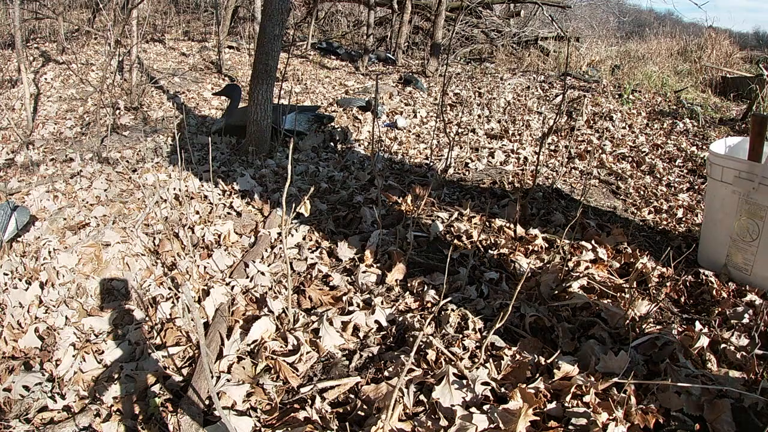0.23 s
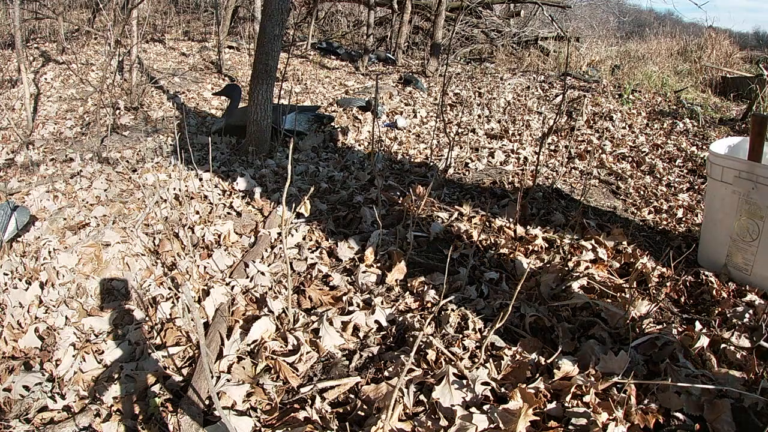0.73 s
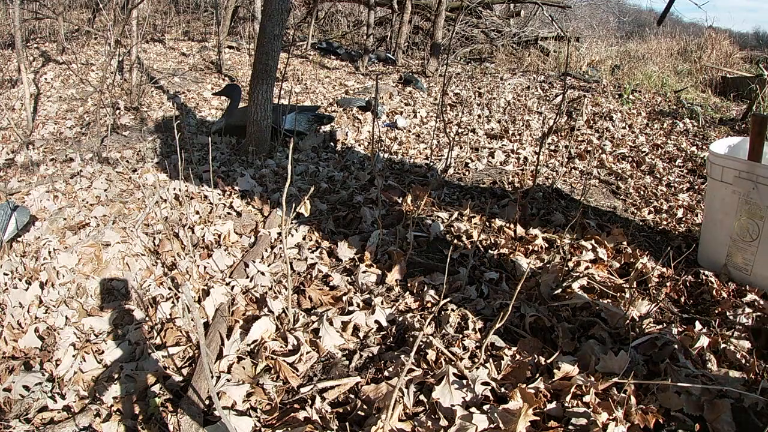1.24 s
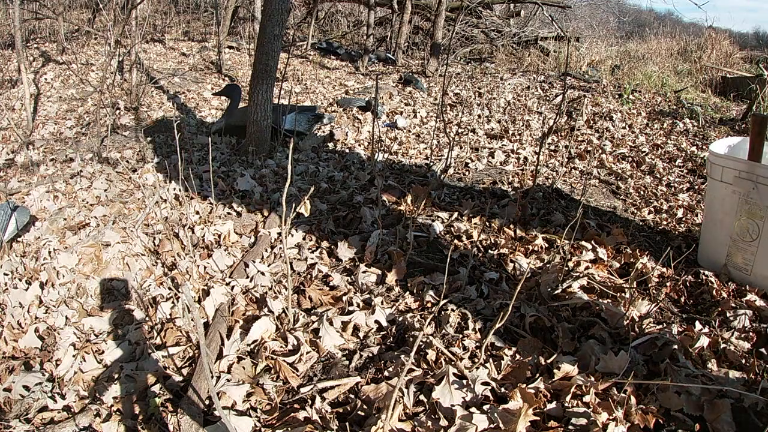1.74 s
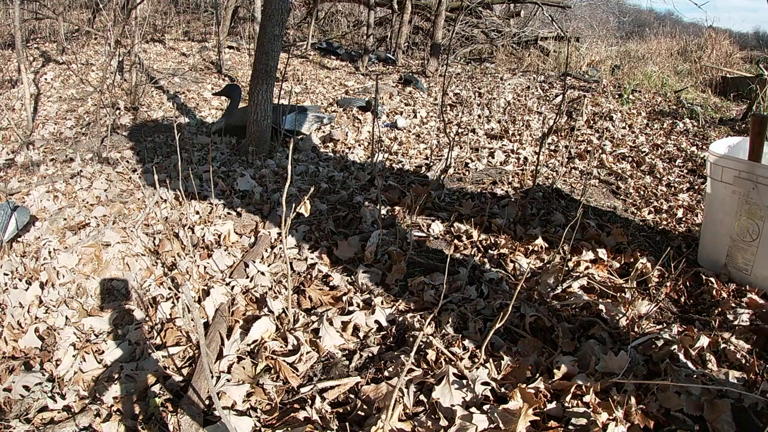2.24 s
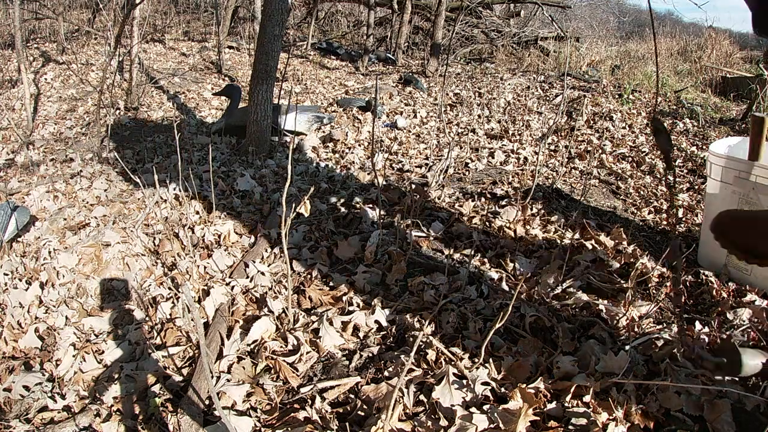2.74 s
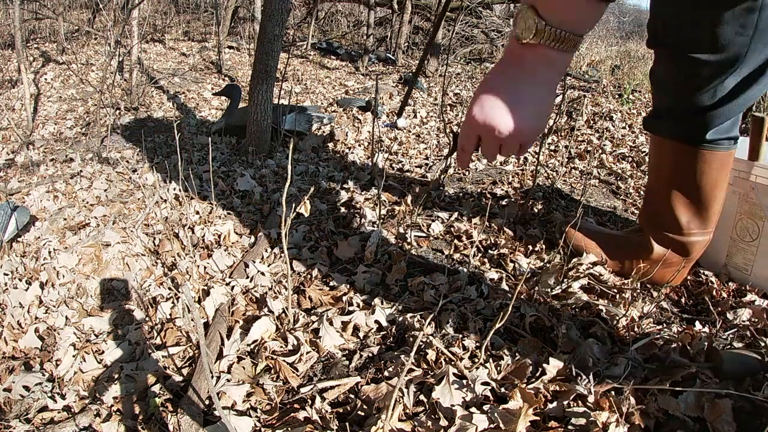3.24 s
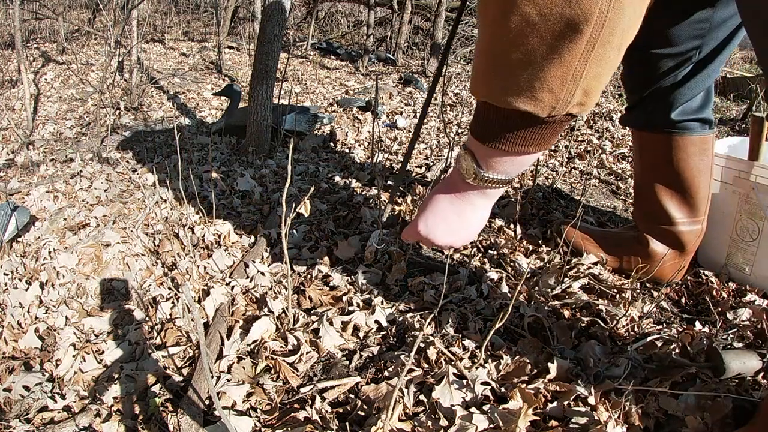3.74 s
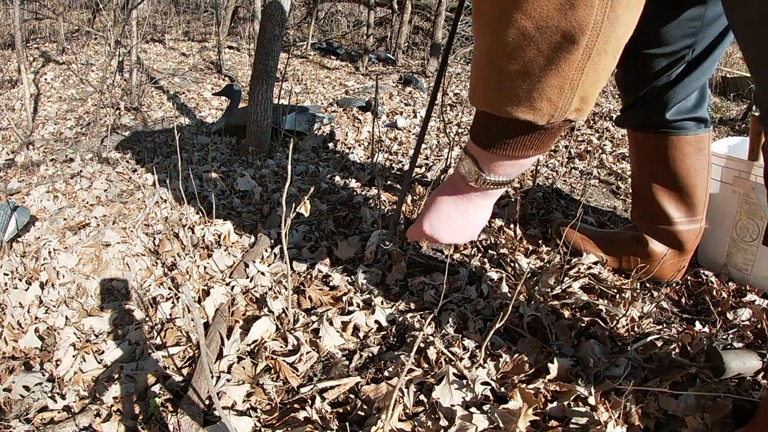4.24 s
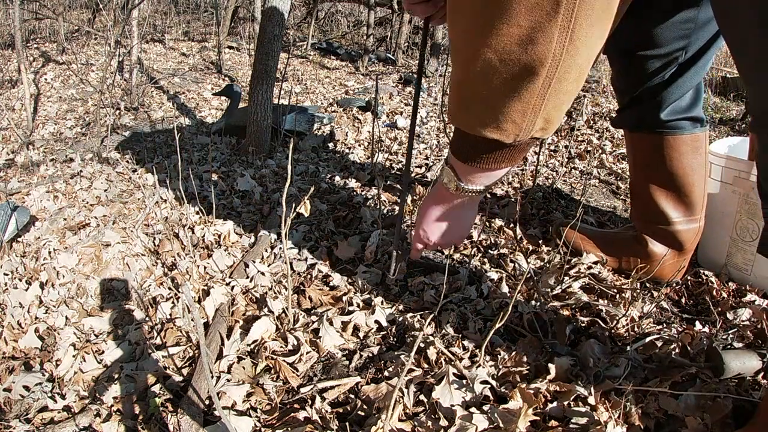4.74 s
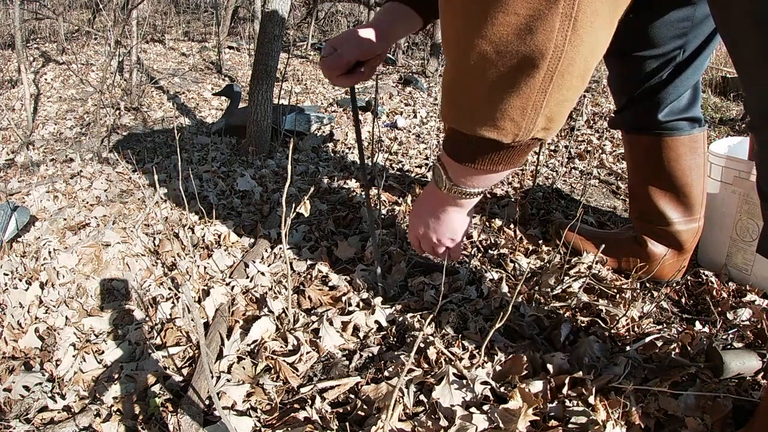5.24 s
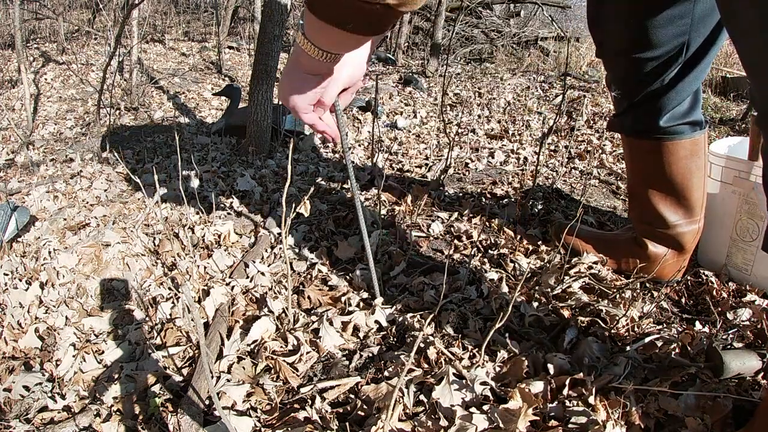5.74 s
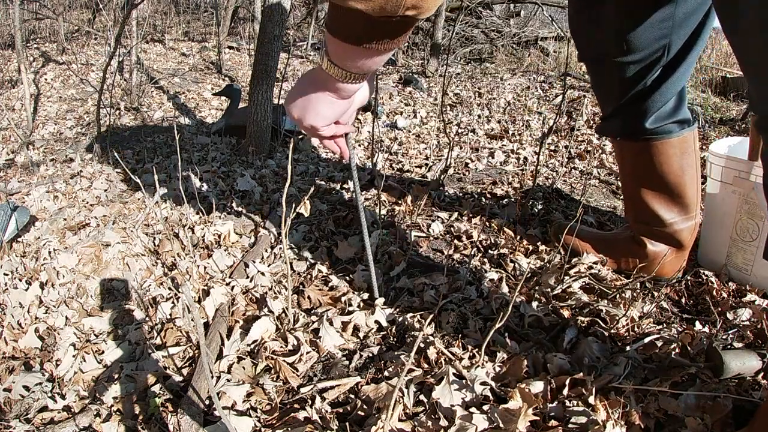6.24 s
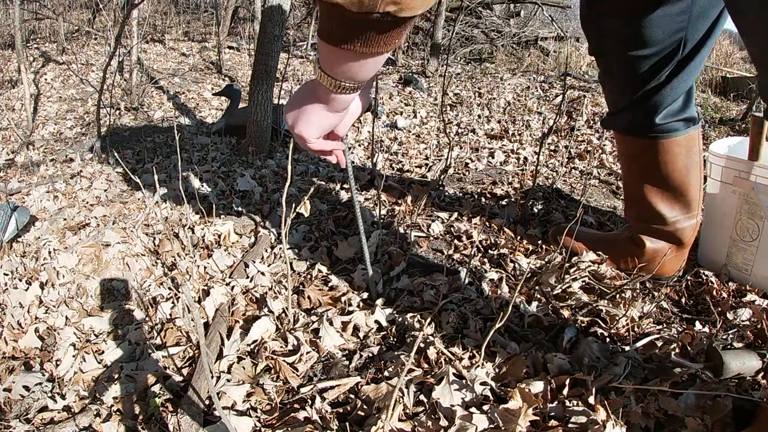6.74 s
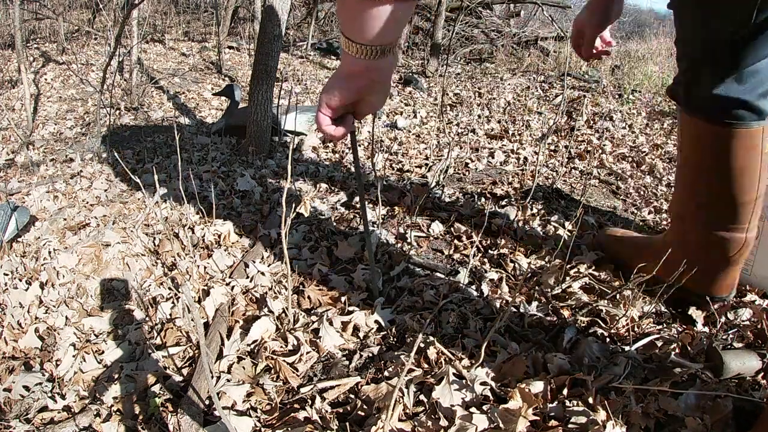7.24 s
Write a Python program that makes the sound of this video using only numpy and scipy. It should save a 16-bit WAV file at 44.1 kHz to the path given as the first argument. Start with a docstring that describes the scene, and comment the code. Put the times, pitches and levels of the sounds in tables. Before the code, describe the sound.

A close, dry, nearly mono outdoor sound: hollow bucket rattles at the very start and again shortly after, a few crisp leaf snaps, then heavy steps crushing brittle leaves, strongest near the middle with a low thump. Quiet rustles and small crunches come as hands work in the litter, then a last sharp snap and sustained crunch. Soft low rumble and engine hum lie far behind.

```python
"""On a woodland floor, boots and hands crush and rustle dry leaves close by.
Early on, two loads clatter into a plastic bucket; the ground thuds and a far engine hums over a low rumble.
Leaves are crowds of tiny damped sines over filtered noise; sharp snaps, and one bright ring as the second
clatter starts, are paired rings with a spray of noise. The bucket is a sum of decaying modes under noise;
thuds and hum are sines with changing level and pitch."""
import sys
import numpy as np
from scipy import signal
from scipy.fft import rfft, irfft, next_fast_len
from scipy.io import wavfile
from scipy.ndimage import map_coordinates

SR = 44100
rng = np.random.default_rng(int(sys.argv[2]) if len(sys.argv) > 2 else 0)


def pcm_store(signal):
    """Save signal as 16-bit PCM."""
    levels = np.round(np.clip(np.atleast_2d(signal), -1, 1) * 32767)
    wavfile.write(sys.argv[1], SR, levels.astype(np.int16).T)


N = 330750  # samples, 7.5 s

# Presses and scuffs of boot, hand or rod. Each row: peak time in seconds, peak level in dB,
# 10 dB rise in seconds, 10 dB fall in seconds, crunch over crisp crackle in dB.
# A negative rise or fall moves that end past the peak; a row whose end precedes its start is silent.
SCUFFS = [(0.101, -50.5, .07, 0.15, 0.5), (0.39, -59, -0.3, .2, -6), (0.508, -44.5, 0.04, -0.02, -2.5),
          (1.041, -46, .20, 0.08, -1.5), (1.101, -43, .02, .13, -3.5), (1.301, -45, .05, 0.11, -5.5),
          (1.370, -36, .055, .10, -4.5), (1.450, -39.5, .02, 0.09, -6), (1.597, -42.5, 0, 0.07, -5),
          (1.7, -53, .04, 0.07, 1), (1.807, -51, 0, 0.1, -5), (2.331, -40, .11, 0.32, -4),
          (2.398, -33, 0.02, .12, -4.5), (2.5, -25.5, 0.0226, 0.1946, -5),
          (2.546, -31, 0.0436, 0.1953, -7.5), (2.758, -26.5, .07, 0.0822, -6),
          (2.874, -28.5, 0.0281, .075, -3.5), (3.026, -24.5, 0.018, 0.1021, 1.5),
          (3.056, -25, 0.038, .05, 2), (3.091, -33.5, 0.0267, 0.0957, 0), (3.176, -32, .08, .04, -2),
          (3.246, -28, .1, .09, -2.5), (3.351, -24, .05, .07, -6), (3.405, -20.5, 0.0283, .045, -5.5),
          (3.441, -20, 0.0384, .02, -2.5), (3.49, -34.5, .02, .15, 4), (3.6, -41.5, 0.07, .1, 5),
          (3.69, -41.5, 0.1, .07, -1.5), (3.784, -45, 0.07, 0.06, -0.5), (3.904, -45, 0.1, 0.1, -1.5),
          (4.285, -47.5, 0.09, -0.5, 3.5), (4.44, -48.5, 0.04, .08, 6.5), (4.497, -50, 0.03, 0, 0),
          (4.655, -50.5, .02, 0.1, 7), (4.73, -44.5, .05, .11, 4.5), (4.912, -38.5, .027, .08, 5.5),
          (4.996, -33.5, .055, .08, 4), (5.052, -33.5, .03, .05, 5), (5.101, -36.5, .04, 0.0748, 6.5),
          (5.161, -36.5, .08, 0.03, 6), (5.231, -46, .1, 0.07, 6), (5.342, -35, .007, 0.1147, 5.5),
          (5.39, -32.5, .04, .045, 7.5), (5.54, -48, 0.1, 0.07, 1.5), (6.468, -40, 0.02, 0.02, -0.5),
          (6.548, -37, 0.05, .03, -3), (6.606, -41.5, 0.09, 0.05, -1), (6.917, -35.3, 0.1356, -0.02, -2.5),
          (7.06, -45.5, 0.33, -0.2, 0), (7.24, -44.5, 0.05, 0.5, 2), (7.296, -26.5, 0.0254, 0.1, -1.5),
          (7.386, -25, 0.0541, 0.3, -3.5), (7.491, -26.5, 0.1944, .30, -4.5)]
# Litter stirring in between. Each row: time in seconds, level in dB, crunch over crisp crackle in dB,
# extra treble fizz in dB, extra deep bed in dB.
STIRRING = [(0, -66, .2, -4.5, 18), (.3, -64, 0.5, -11, 6.5), (.61, -63, -1.5, -12, 5.5),
            (.81, -54, 0, -6.5, 2.5), (1.31, -56.5, -3.2, -3.5, -1.5), (1.74, -57, .2, 2.5, 3.5),
            (1.92, -60.5, -8, 5.5, 2.2), (2.12, -57, -11, -2, 0.8), (2.4, -55, -2, 3, 0),
            (2.75, -53.5, .2, 0, -1.3), (3.3, -50, 3, 2, 2.5), (3.6, -53, 2.2, -3, -0.2),
            (4.19, -59, 4, .5, 0.5), (4.61, -58.5, 5.5, -1, -1), (4.85, -55.5, 6, 2, 2.5),
            (5.1, -54.5, 4, 2, -7.2), (5.4, -53, 3.5, 2.5, -6.2), (5.8, -50.5, -1, 11.5, 5.2),
            (6.03, -49.5, -1.2, 14.5, 3), (6.14, -54, 1, 5, 4.5), (6.44, -52.5, 2, 4.5, -3),
            (6.71, -50, 2.5, 3.5, 1.5), (6.9, -49, 2, -2.5, -1.5), (7.17, -55, 4, 3.5, 7.5),
            (7.3, -52, -4, 5, 2.5), (7.5, -48.5, .2, 4.5, 4.5)]
# Spectrum of crisp, thin breakage. Each row: frequency in Hz, gain in dB.
CRISP_SPECTRUM = [(1500, -25), (3000, -19.5), (5000, -8), (7000, -1), (8300, -3.5), (10000, -18.5),
                  (11500, -35), (15000, -40.5)]
# Spectrum of coarser, crunching breakage. Each row: frequency in Hz, gain in dB.
CRUNCH_SPECTRUM = [(500, -51.5), (1000, -9), (2000, -2.5), (3300, 1), (4500, 1), (6500, -5.5),
                   (10000, -61.5)]
# Spectrum of the deep bed of crushed litter. Each row: frequency in Hz, gain in dB.
CRUSH_SPECTRUM = [(60, -44.5), (150, -3.5), (400, -2.5), (900, -1.5), (1500, -3.5), (3000, -71)]
# Spectrum of the finest fizz. Each row: frequency in Hz, gain in dB.
FIZZ_SPECTRUM = [(8000, -28), (10200, 4.5), (12500, -2), (15000, -7)]
# A thin leaf through the microphone. Each row: frequency in Hz, gain in dB.
LEAF_SPECTRUM = [(200, -25), (900, -5.5), (8300, 1), (10000, -6), (11500, -29), (15000, -27.5)]
# Single sharp snaps of leaves and twigs, and one bright ring, at 0.67 s, as the bucket clatter starts.
# Each row: start in seconds, level in dB before the leaf spectrum, high pitch in Hz, body pitch in Hz,
# body level over the high ring in dB.
SNAPS_AND_RING = [(0.3656, -25, 7500, 3280, -26), (0.411, -20.5, 6400, 4530, -36),
                  (0.503, -27, 7860, 2630, -19), (0.6699, -8, 6900, 3200, -14),
                  (0.9365, -25, 7500, 3180, -25), (1.1183, -18.5, 5800, 3280, 1),
                  (1.268, -27.5, 8010, 3620, -20), (1.3618, -23, 7700, 3180, -17),
                  (1.3945, -19, 6000, 2930, -9), (1.426, -23, 7820, 3150, -14),
                  (1.4525, -15.5, 8350, 4140, -23), (1.5723, -22, 7000, 3600, -20),
                  (1.59, -18, 7840, 4160, -32), (1.6673, -29.5, 4340, 4330, 0.5),
                  (1.8007, -26, 8050, 3080, 1), (1.8296, -25, 6500, 4100, -8),
                  (1.923, -31, 4600, 4330, -12), (1.979, -27.5, 7300, 2710, -26.5),
                  (2.3418, -20, 8400, 3660, -25), (2.394, -20, 7850, 3900, -16),
                  (2.406, -19, 7500, 4000, -15), (2.4219, -14, 8200, 3330, -8),
                  (2.4966, -14, 6930, 3180, -6), (2.761, -16, 6700, 3760, 4), (2.81, -18, 7500, 5500, -8),
                  (2.8384, -9.5, 7550, 1410, -9.5), (2.8499, -10, 7450, 3880, -1),
                  (2.8678, -14, 6620, 3760, -8), (2.878, -11.5, 6200, 4330, -13),
                  (2.9393, -21, 7230, 4010, 3), (3.0253, -13.5, 5760, 2100, 0),
                  (3.0523, -12.5, 4860, 3900, 3), (3.0786, -16, 6520, 3790, 1),
                  (3.1733, -8.5, 4940, 3930, -11), (3.3141, -11.5, 6600, 2480, -7),
                  (3.438, -10.5, 7400, 3050, -18), (3.4576, -15, 4470, 4300, -6),
                  (3.528, -20, 7500, 4500, -2), (3.592, -23.5, 6700, 2050, 6.5),
                  (3.7805, -20.5, 6400, 3750, -8), (3.906, -24, 6900, 2610, -8),
                  (4.0223, -31.5, 7640, 3490, -13), (4.259, -38.5, 7260, 2830, 9),
                  (4.286, -33, 6790, 3370, -8), (4.4097, -37, 5740, 2230, 0), (4.6497, -34, 7520, 3880, -1),
                  (4.7611, -29.5, 5130, 3420, -6), (4.7796, -24.5, 5160, 3000, -1.5),
                  (4.9046, -28, 4760, 3430, -1), (4.9228, -27, 4840, 3460, 3),
                  (4.9697, -25.5, 6690, 3460, 0), (5.044, -24, 4620, 2800, 2), (5.0994, -27, 5630, 3750, 3),
                  (5.3408, -21, 5460, 3020, -5), (5.362, -24, 5460, 3300, 3), (5.429, -20, 5650, 2520, -3),
                  (5.9143, -29, 5670, 3630, -17), (5.9376, -32, 8500, 3840, -6),
                  (5.962, -33, 6800, 1910, 5), (5.9793, -29, 7200, 3050, -14),
                  (6.0127, -32, 7430, 4500, -17), (6.035, -30, 7600, 4110, -16),
                  (6.0713, -27.5, 7700, 2650, -6), (6.1983, -27, 4500, 4200, -6),
                  (6.236, -33.5, 8000, 2220, -15), (6.2801, -33, 7730, 4390, -8),
                  (6.3001, -32, 5570, 3160, 4.5), (6.462, -18.5, 7200, 4400, -17),
                  (6.467, -21, 6440, 4160, -20), (6.498, -19, 5760, 3650, -6),
                  (6.527, -18.5, 8460, 3960, -8), (6.6075, -28.5, 5210, 4300, 2),
                  (6.68, -27, 8000, 5500, -6), (6.685, -20, 6330, 4340, -18),
                  (6.862, -18.5, 5900, 3750, -13), (6.982, -26, 5960, 4350, -20),
                  (7.042, -22.5, 6570, 1900, -1.5), (7.1288, -10, 8300, 6550, -8),
                  (7.379, -11, 6240, 3310, -18)]
# Knocks in the bucket. Each row: start in seconds, rattle level in dB, boom level in dB, tick level in dB,
# nominal 60 dB decay of the rattle in seconds; all levels are relative settings.
KNOCKS = [(0.027, -6.5, -10.5, -24, 0.044), (0.038, -10.5, -13.5, -32.5, 0.1),
          (0.062, -14, -15.5, -38.5, 0.069), (0.085, -19.5, -25.5, -42, 0.074),
          (0.113, -24, -29.5, -57, 0.08), (0.144, -26, -28, -53, 0.058), (0.165, -24.5, -24, -42, .089),
          (0.198, -26, -33.5, -48, 0.046), (0.218, -25, -29.5, -46.5, .048), (0.271, -37, -37, -55, .05),
          (0.344, -50, -47.5, -55, .035), (0.52, -55, -53, -60, .04), (0.67, -14, -28, -21.5, 0.072),
          (0.674, -1, -13, -33, .07), (0.701, -2, -11, -23.5, 0.07), (0.718, -5.5, -35, -31.5, .046),
          (0.731, -11, -15.5, -42, .11), (0.77, -12, -27, -42, .059), (0.784, -14, -22.5, -35.5, .075),
          (0.815, -17.5, -24.5, -55, .086), (0.835, -16, -27, -61, .037), (0.878, -26, -27.5, -58, .069),
          (0.902, -10.5, -28.5, -37, 0.044)]
# Modes of the plastic walls, lowest first. Each row: mean frequency in Hz, mean level in dB before
# the lowest-mode trim, 60 dB decay in seconds.
BUCKET_MODES = [(123.4, 1.5, 0.15), (184.8, -2.5, 0.1), (216, 1.5, 0.12), (268, 3.5, 0.09),
                (303, -1, 0.087), (423, -5, 0.081), (657, -22.5, 0.16), (1030, -5.5, 0.035),
                (1303, -15.5, 0.054), (1670, -15.5, 0.057)]
# Spectrum of the rattle in the bucket. Each row: frequency in Hz, gain in dB.
RATTLE_SPECTRUM = [(290, -42), (500, -11.5), (1300, -9.5), (1650, -6.5), (2200, -11.5), (3120, -10.5),
                   (5000, -18), (6500, -27), (11000, -120)]
# Weight and rod on the ground. Each row: start in seconds, level in dB before the slow rise,
# settled pitch in Hz.
THUDS = [(.03, -42, 55), (.7, -32.5, 50), (1.37, -42, 68), (1.415, -32, 66), (2.52, -48, 45),
         (2.74, -48, 42), (3.08, -34.5, 52.4), (3.2, -30.5, 52), (3.442, -24, 98), (3.46, -18.5, 45.2),
         (5.892, -38.5, 316), (5.961, -40, 219), (5.97, -49, 50), (6.497, -35, 330), (6.85, -37, 50),
         (7.44, -40, 50)]
# Hum of the far engine. Each row: time in seconds, mean low tone level in dB, mean high tone level in dB.
HUM_LEVELS = [(0, -53.5, -53.5), (1.2, -62.5, -74), (2.6, -61.5, -68), (3.8, -73, -67), (5.5, -80, -62),
              (6.6, -72, -63.5), (7.5, -64, -67)]
# Spectrum of the far, traffic-like rumble. Each row: frequency in Hz, gain in dB.
RUMBLE_SPECTRUM = [(25, -8), (60, 0), (100, -7), (190, 3), (240, -10), (400, -32.5)]
# Spectrum of the air of the wood. Each row: frequency in Hz, gain in dB.
AIR_SPECTRUM = [(200, -29.5), (500, -13.5), (1500, 1), (2700, -11.5), (7500, -5), (11000, -24),
                (14000, -30), (15300, -50)]
# Side signal made from a phase-scrambled copy. Each row: frequency in Hz, gain on that copy in dB.
SIDE_SPECTRUM = [(400, -88), (1200, -65), (8000, -53.5), (10500, -32), (12000, -5), (15000, 4.5)]

DEEP_DB, DEEP_PER_COARSE = -14, .55  # deep bed against the level; coarse breakage reaches deeper
FIZZ_DB, FIZZ_PER_COARSE = -25, 0.63  # finest fizz against the level; it grows likewise
PAPERY_DB, PAPERY_PER_COARSE = -20, 2.1  # big stiff leaves ring near one pitch in coarse breakage
SECOND_LOAD_S = .6  # later knocks belong to the second load
LOWEST_MODE_DB = (-4.5, -7.5)  # fuller bucket, weaker lowest mode: first and second load
BRIGHT_FASTER, TICK_FASTER = 1.15, 1.25  # decay speeds of bright rattle and tick against the dull body
DULL = 0.14  # low-pass share a sample for the body of the rattle
THUD_HZ, THUD_RISE_S, THUD_T60_S = 50, 0.025, 0.29  # rise and 60 dB decay of a thud at THUD_HZ
RISE_POWER, T60_POWER = 1.8, 1.23  # higher thuds are quicker by these powers of pitch
SAG, SAG_S = 0.23, .035  # a thud starts higher by this share and sinks to its pitch
HUM_HZ = 73.7, 148
AIR_DB = -72.5
TOP_HZ = 15830  # band limit


def litter():
    """Superposition: breakage of several sizes sounds together, modulated by jerks that all sizes share."""
    level_db, tilt_db, extra_db, depth_db = effort()
    crush_db = DEEP_DB + DEEP_PER_COARSE * tilt_db + depth_db
    fizz_db = FIZZ_DB + FIZZ_PER_COARSE * tilt_db + extra_db
    papery_db = PAPERY_DB + PAPERY_PER_COARSE * tilt_db
    jerks = amp(0.61 * wobble(40) + 1.6 * wobble(110))
    crisp = crackle(CRISP_SPECTRUM, count=30000, hz=6860, spread=0.43, cycles=1.46,
                    size_db=5.0, clump_db=1.6, hiss_db=-0.5)
    crunch = crackle(CRUNCH_SPECTRUM, count=20000, hz=2960, spread=0.46, cycles=1.8,
                     size_db=4.5, clump_db=0.7, hiss_db=1.0)
    crush = crackle(CRUSH_SPECTRUM, count=8000, hz=813, spread=0.31, cycles=.8,
                    size_db=2, clump_db=0.5, hiss_db=5.5)
    fizz = crackle(FIZZ_SPECTRUM, count=2500, hz=11000, spread=0.25, cycles=1.5,
                   size_db=5, clump_db=2.8, hiss_db=0)
    papery = crackle(CRUNCH_SPECTRUM, count=4000, hz=3550, spread=0.07, cycles=5,
                     size_db=3, clump_db=2, hiss_db=-20)
    whole = fractures(count=2000, size_db=3.0, t60=0.0067, low_hz=1800, octaves=2.3, ring_db=2.5)
    turn = np.arctan(amp(tilt_db))  # crisp and crunch share the same power
    sizes = np.cos(turn) * crisp + np.sin(turn) * crunch
    sizes += amp(crush_db) * crush + amp(fizz_db) * fizz
    sizes += amp(papery_db) * papery + amp(-7.5) * whole
    return amp(level_db) * unit(jerks) * sizes


def effort():
    """Addition of powers: scuffs join the stirring, and the loudest sets the grain; returns dB curves."""
    stir_db, stir_coarse, *extras_db = curves(STIRRING)
    power, t = amp(stir_db) ** 2, np.arange(N) / SR
    coarse = power * stir_coarse
    for s, db, rise, fall, coarse_db in SCUFFS:
        begin = max(round((s - 5 * rise) * SR), 0)
        near = slice(begin, round((s + 5 * fall) * SR))
        steps = np.where(t[near] < s, (s - t[near]) / rise, (t[near] - s) / fall)  # of 10 dB below peak
        share = np.zeros(N)
        share[near] = amp(db - 10 * steps) ** 2
        power = power + share
        coarse = coarse + share * coarse_db
    return 10 * np.log10(power), coarse / power, *extras_db


def crackle(colour, count, hz, spread, cycles, size_db, clump_db, hiss_db):
    """Impulsive excitation: many tiny damped sines, in clumps, over the hiss of sliding leaves."""
    when, sign, rare = rng.random((count, 3)).T
    pitch = np.clip(hz * np.exp(spread * rng.standard_normal((count, 1))), 100, SR / 2.5)
    step = np.arange(64)
    phase = pitch * step / SR  # in cycles
    size_gain = amp(np.minimum(-size_db * np.log(rare), 20))  # few cracks are big, none huge
    size = np.sign(sign - .5) * size_gain
    fade = np.hanning(128)[64:]
    cracks = size[:, None] * np.sin(2 * np.pi * phase) * np.exp(-phase / cycles) * fade
    grains = scattered(when, cracks)
    hiss = rng.standard_normal(N)
    bed = unit(coloured(grains, colour)) + amp(hiss_db) * unit(coloured(hiss, colour))
    return unit(bed * amp(clump_db * wobble(60)))


def fractures(count, size_db, t60, low_hz, octaves, ring_db):
    """Brittle fracture: each whole-leaf crack is a few ms of noise ringing at its own piece's pitch."""
    when, rare, high = rng.random((count, 3)).T
    step = np.arange(160)
    ring = np.sin(2 * np.pi * low_hz * 2 ** (octaves * high[:, None]) * step / SR)
    noise = rng.standard_normal((count, len(step))) + amp(ring_db) * ring
    size = amp(np.minimum(-size_db * np.log(rare), 15))
    bursts = size[:, None] * noise * amp(-60 * step / SR / t60)
    return unit(coloured(scattered(when, bursts), LEAF_SPECTRUM))


def snaps_and_ring():
    """Free vibration: each sharp sound is a high and a low damped ring, then a spray of noise for a few ms."""
    out, t = np.zeros(N), np.arange(SR // 30) / SR
    for s, db, pitch_hz, body_hz, body_db in SNAPS_AND_RING:
        stiff, long = rng.standard_normal(2)
        high_t60, spray_t60 = 0.0022 * np.exp(0.2 * stiff), 0.014 * np.exp(0.12 * long)
        high = amp(-60 * t / high_t60) * np.sin(2 * np.pi * pitch_hz * t)
        low = amp(body_db - 60 * t * body_hz / 8) * np.sin(2 * np.pi * body_hz * t)  # dies in a few cycles
        broad = amp(-12.5 - 60 * t / 0.0033) * rng.standard_normal(len(t))
        kick = 1.245 * (high + low + broad)
        spray = amp(-27.5 - 60 * t / spray_t60) * rng.standard_normal(len(t)) ** 3
        spray[0] = 1  # the first kick itself
        sharp = signal.fftconvolve(kick, spray)[:len(t)]
        same_peak = np.abs(kick).max() / np.abs(sharp).max()
        add(out, s + .0007, amp(db) * same_peak * sharp)
    return coloured(out, LEAF_SPECTRUM)


def bucket():
    """Modal resonance: every knock rings the walls at new strengths, under a rattle and a bright tick."""
    boom, rattle, dull, ticks = np.zeros((4, N))
    t = np.arange(SR // 3) / SR
    for s, db, boom_db, tick_db, t60 in KNOCKS:
        scatter = rng.standard_normal((len(BUCKET_MODES), 2))
        modes = [amp(level + 2.2 * a - 60 * t / life) * np.sin(2 * np.pi * hz * (1 + 0.017 * b) * t)
                 for (hz, level, life), (a, b) in zip(BUCKET_MODES, scatter)]
        ring = amp(LOWEST_MODE_DB[int(s > SECOND_LOAD_S)]) * modes[0] + sum(modes[1:])
        swing = 1 - np.exp(-(t / 0.0042) ** 2)  # the walls take a moment to swing
        add(boom, s, amp(boom_db) * ring * swing)
        chatter_db = 3 * rng.standard_normal(len(t) // 20 + 1).repeat(20)[:len(t)]  # loose parts
        fall_db = -60 * (t / max(t60, .005)) ** 1.1 + chatter_db
        add(rattle, s, amp(db + BRIGHT_FASTER * fall_db) * rippled(len(t), ripple_db=3))
        add(dull, s, amp(db + fall_db) * rippled(len(t), ripple_db=3))
        add(ticks, s, amp(tick_db + TICK_FASTER * fall_db) * rippled(len(t), ripple_db=5.0))
    body = signal.lfilter([DULL], [1, DULL - 1], dull)
    clatter = coloured(amp(3) * rattle + amp(4.5) * body, RATTLE_SPECTRUM)
    return boom + clatter + amp(6.0) * coloured(ticks, CRISP_SPECTRUM)


def rippled(size, ripple_db):
    """Random resonance: noise with peaks a few hundred Hz wide, so that no two pieces ring alike."""
    knots = rng.standard_normal(50)
    gain = amp(ripple_db * map_coordinates(knots, [np.linspace(0, 49, size // 2 + 1)]))
    return unit(irfft(rfft(rng.standard_normal(size)) * gain, size))


def thuds():
    """Damped oscillation: soft ground swings under a shift of weight or jab of the rod; the soil grumbles."""
    swings, soil = np.zeros((2, N))
    t = np.arange(SR // 2) / SR
    for s, db, hz in THUDS:
        rise = THUD_RISE_S * (THUD_HZ / hz) ** RISE_POWER
        t60 = THUD_T60_S * (THUD_HZ / hz) ** T60_POWER
        swell = amp(db - 60 * t / t60) * (1 - np.exp(-(t / rise) ** 2))
        sagging_time = t + SAG * SAG_S * (1 - np.exp(-t / SAG_S))  # runs fast at first
        add(swings, s, swell * np.sin(2 * np.pi * hz * sagging_time))
        add(soil, s, swell)
    grumble = unit(coloured(rng.standard_normal(N), [(40, -22), (90, 3.0), (180, 2), (400, -30.5)]))
    return swings + amp(-13.5) * soil * grumble


def distance():
    """Background sources: two wavering tones of a far engine and a low rumble over the air of the wood."""
    t, tones = np.arange(N) / SR, np.zeros(N)
    for db, hz in zip(curves(HUM_LEVELS), HUM_HZ):
        phase_drift = .9 * wobble(9)  # radians
        tones += amp(db + 2.0 * wobble(9)) * np.sin(2 * np.pi * hz * t + phase_drift)
    rumble = amp(-71.0 + 2.3 * wobble(3)) * unit(coloured(rng.standard_normal(N), RUMBLE_SPECTRUM))
    air = amp(AIR_DB) * unit(coloured(rng.standard_normal(N), AIR_SPECTRUM))
    return tones + rumble + air


def amp(db):
    """Decibel law: level in dB to amplitude."""
    return 10 ** (np.asarray(db) / 20)


def unit(x):
    """Normalisation: scales a signal to an RMS of one."""
    return x / np.sqrt(np.mean(x ** 2) + 1e-20)


def curves(rows):
    """Linear interpolation: one value per sample for each column after the time."""
    s, *cols = np.transpose(rows)
    return [np.interp(np.arange(N) / SR, s, c) for c in cols]


def wobble(rate):
    """Slow random modulation: a smooth curve through rate random knots a second."""
    return map_coordinates(rng.standard_normal(int(N * rate / SR) + 4), [np.arange(N) * rate / SR])


def along(points, hz):
    """Logarithmic frequency scale: (Hz, dB) points read on a log axis, as gain."""
    f, db = np.transpose(points)
    return amp(np.interp(np.log(hz + 1), np.log(f + 1), db))


def coloured(x, points):
    """Minimum-phase filtering: a causal filter, folded in the cepstrum, follows the (Hz, dB) points."""
    m = 4096
    cepstrum = irfft(np.log(along(points, np.fft.rfftfreq(m, 1 / SR)) + 3e-4), m)
    cepstrum[1:m // 2] *= 2
    cepstrum[m // 2 + 1:] = 0
    return signal.fftconvolve(x, irfft(np.exp(rfft(cepstrum)), m))[:N]


def add(track, s, sound):
    """Linear superposition: mixes a sound into the track at s seconds."""
    part = track[round(s * SR):][:len(sound)]
    part += sound[:len(part)]


def scattered(when, grains):
    """Random arrivals: sums each row of grains at its share, 0 to 1, of the whole duration."""
    length = grains.shape[1]
    where = (when * N).astype(int)[:, None] + np.arange(length)
    return np.bincount(where.ravel(), grains.ravel(), N + length)[:N]


def scene():
    """Superposition of all sources, the same in both channels."""
    return (litter() + snaps_and_ring() + bucket() + thuds() + distance()) * np.ones((2, 1))


def record(dry):
    """Mid and side: the channels differ mostly in the top treble; nothing passes above the band limit."""
    z = signal.stft(dry[0], nperseg=128)[2]
    scrambled = z * np.exp(2j * np.pi * rng.random(z.shape))
    unrelated = signal.istft(scrambled, nperseg=128)[1][:N]
    m = next_fast_len(N + SR // 2)
    hz = np.fft.rfftfreq(m, 1 / SR)
    side = rfft(unrelated, m) * along(SIDE_SPECTRUM, hz)
    side += rfft(dry[0], m) * 0.089 * (hz > 11000)  # left hears the fizz better
    return irfft((rfft(dry, m) + [side, -side]) * (hz < TOP_HZ), m)[:, :N]


dry = scene()
out = record(dry)
pcm_store(out)
```